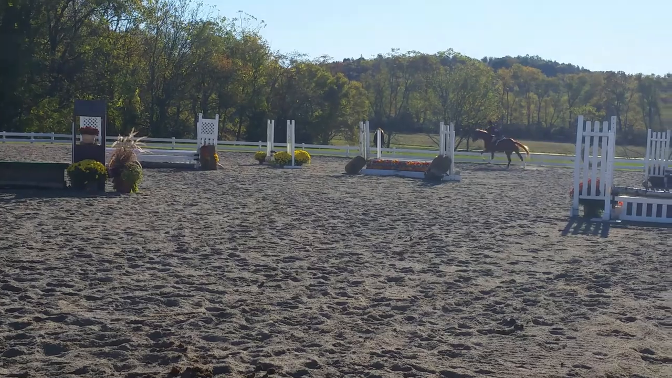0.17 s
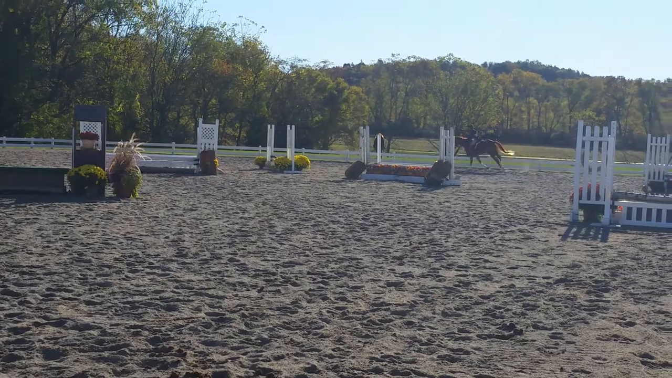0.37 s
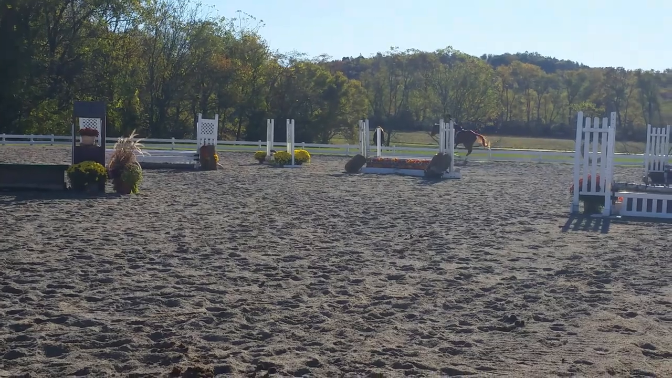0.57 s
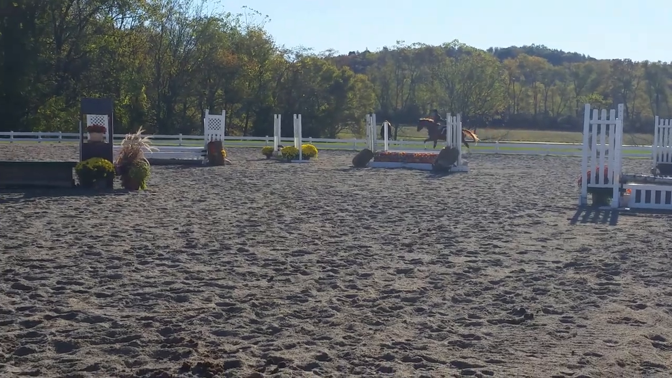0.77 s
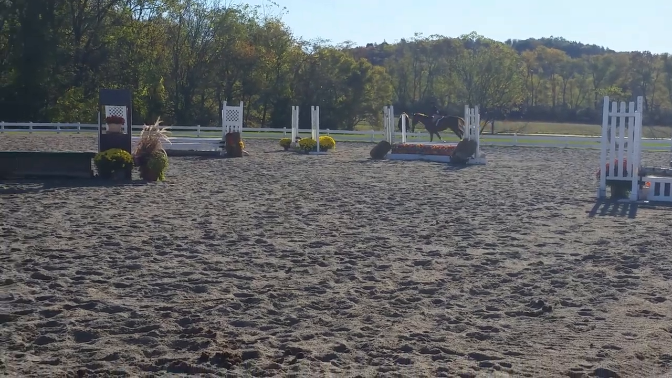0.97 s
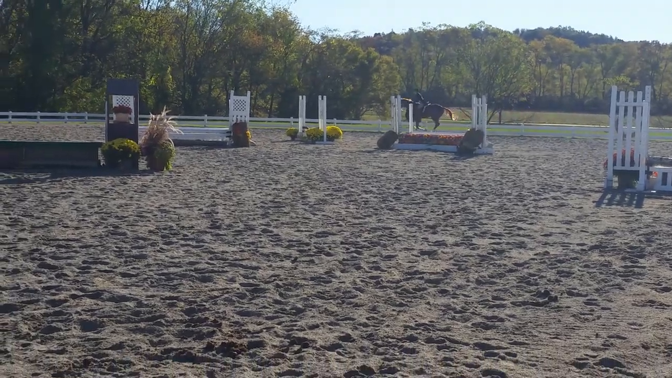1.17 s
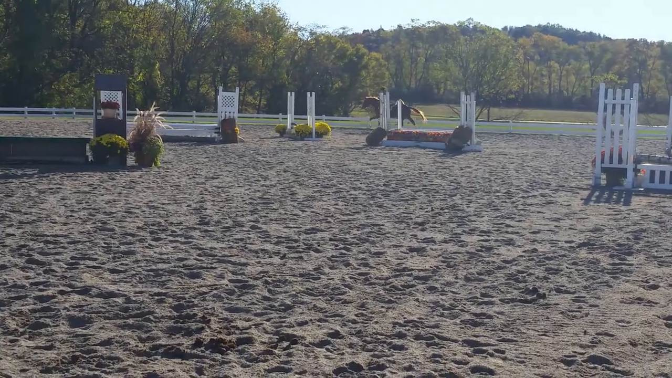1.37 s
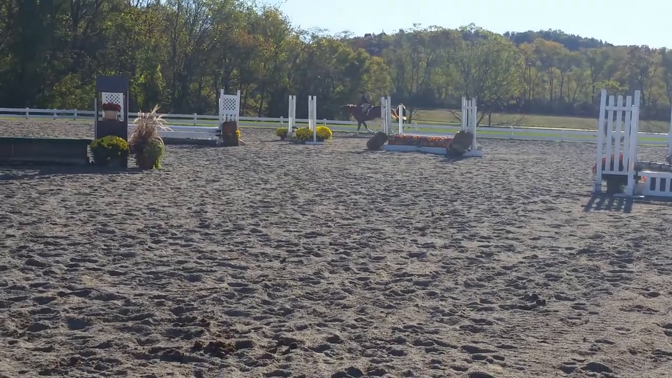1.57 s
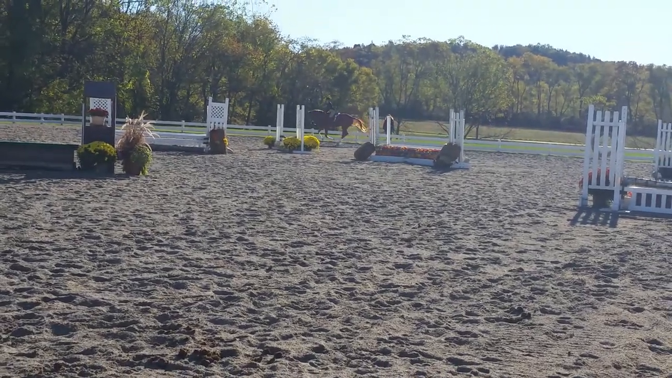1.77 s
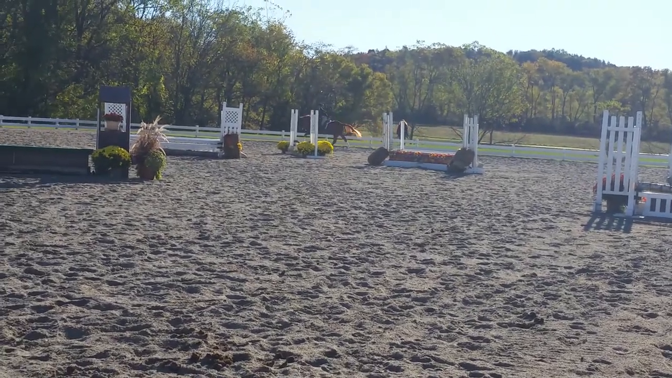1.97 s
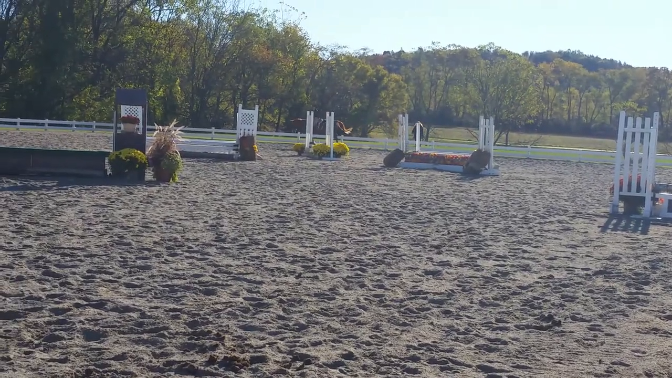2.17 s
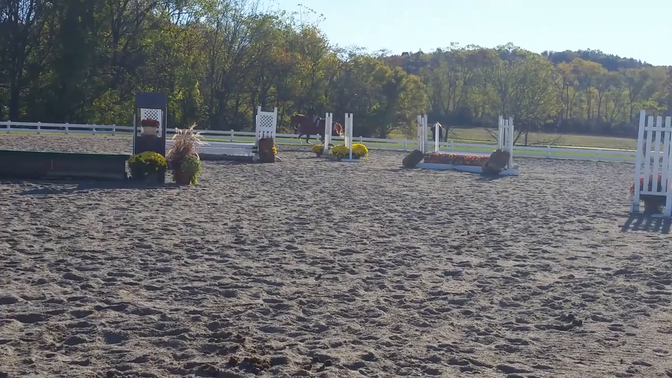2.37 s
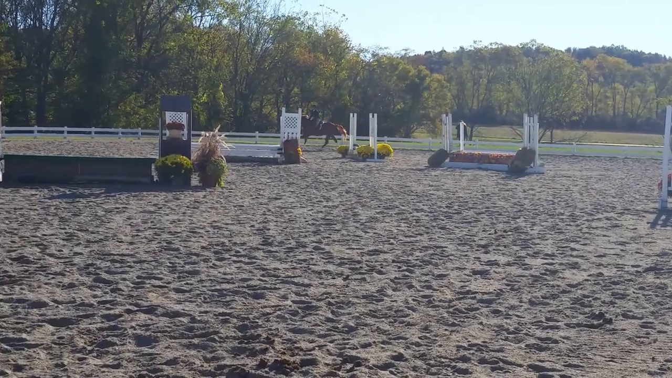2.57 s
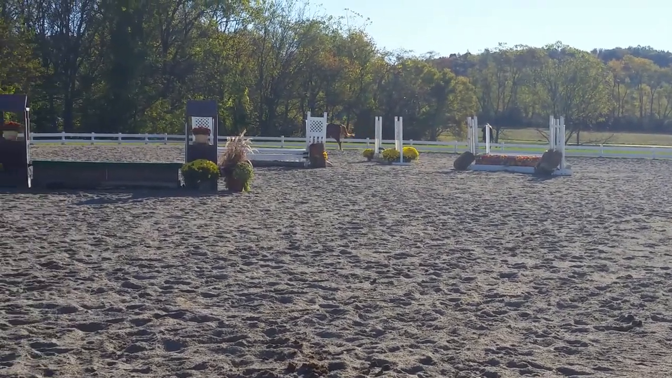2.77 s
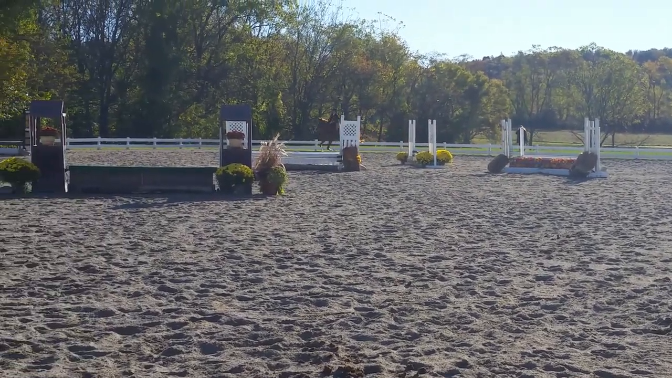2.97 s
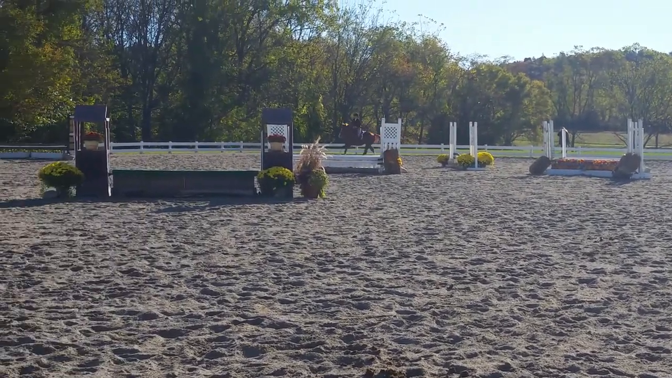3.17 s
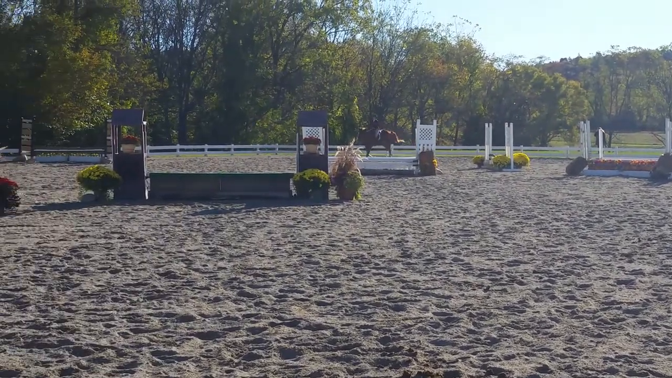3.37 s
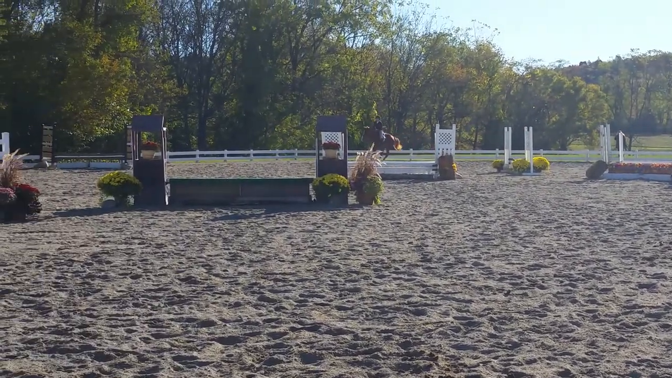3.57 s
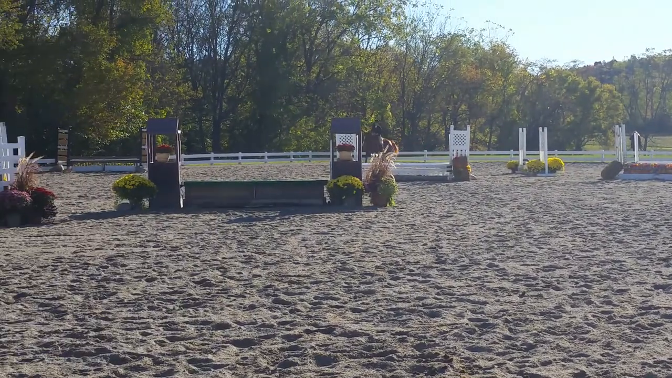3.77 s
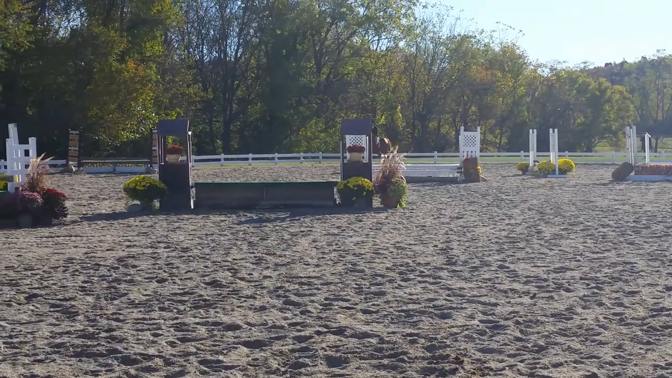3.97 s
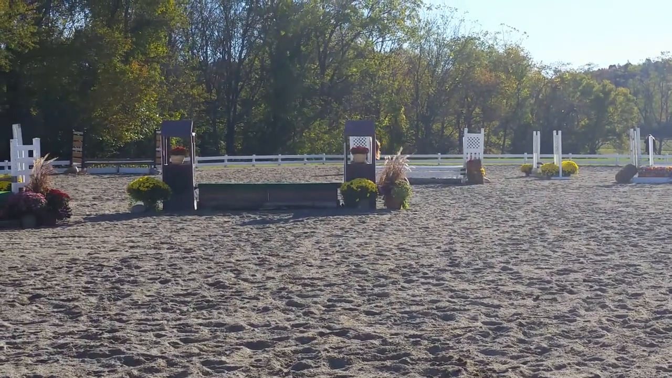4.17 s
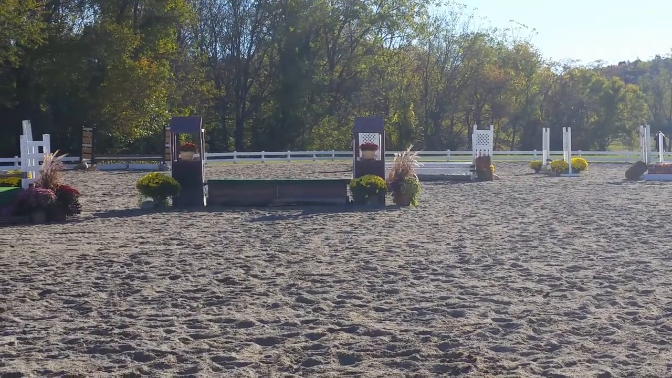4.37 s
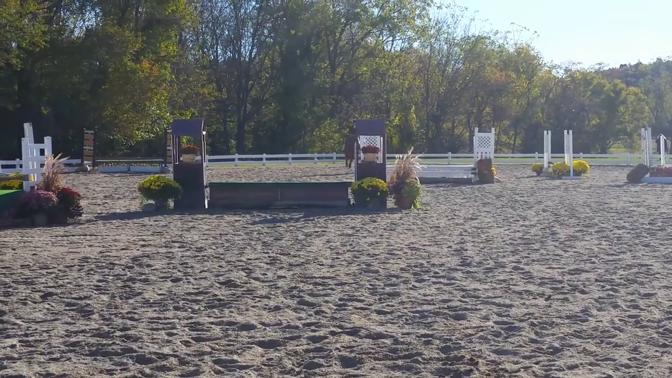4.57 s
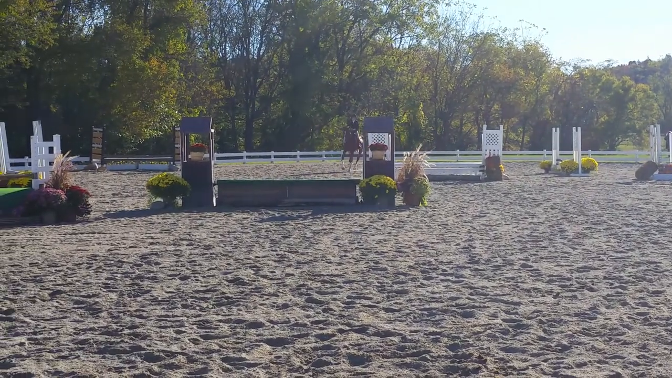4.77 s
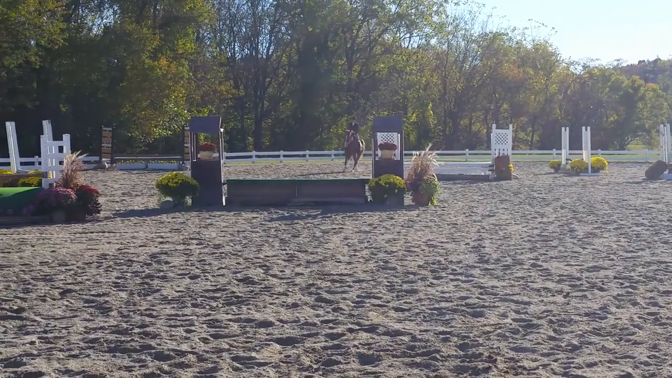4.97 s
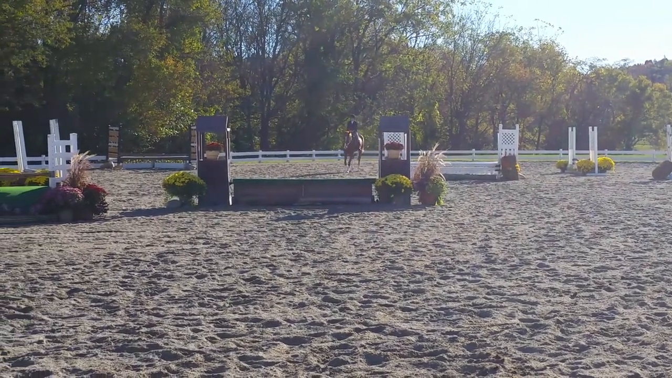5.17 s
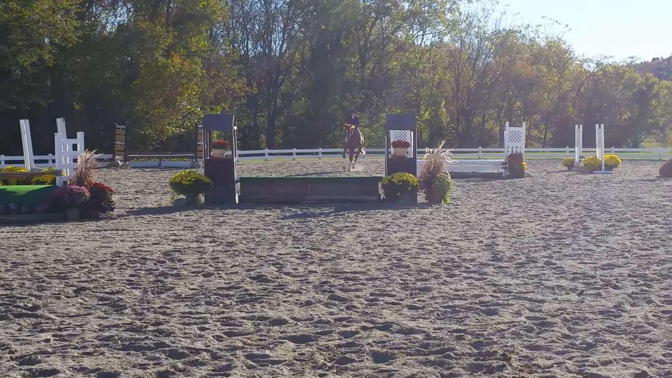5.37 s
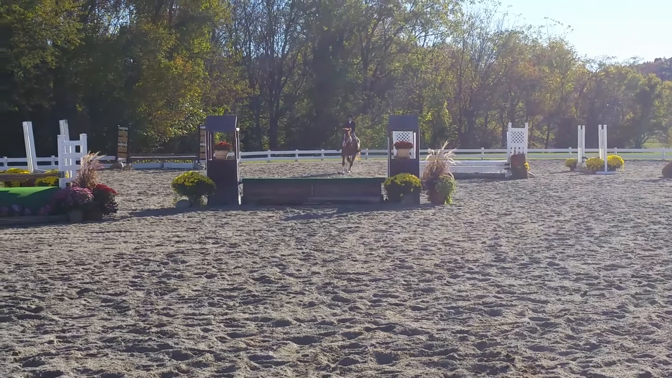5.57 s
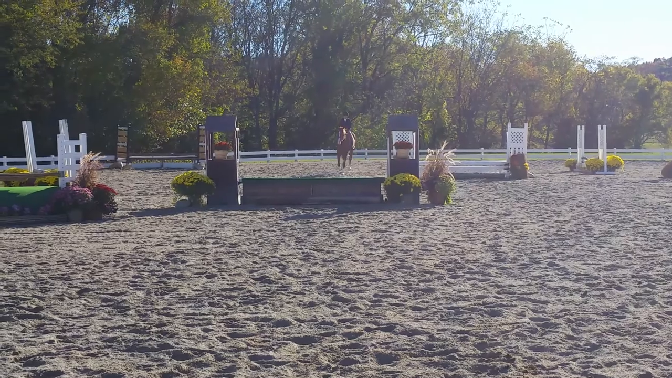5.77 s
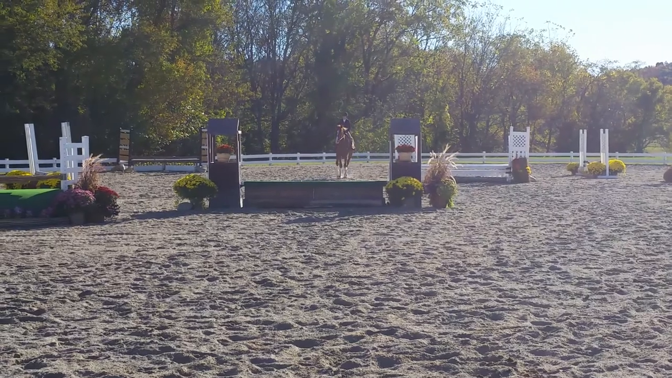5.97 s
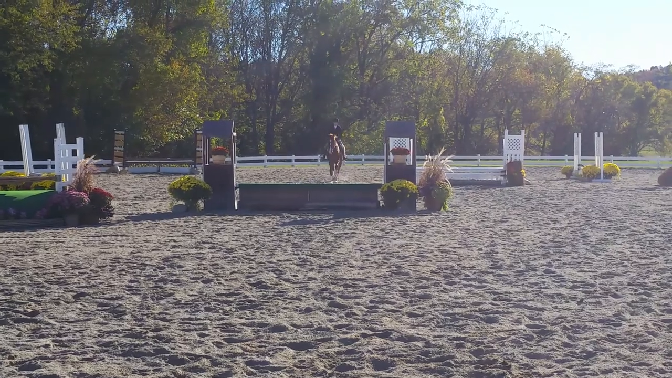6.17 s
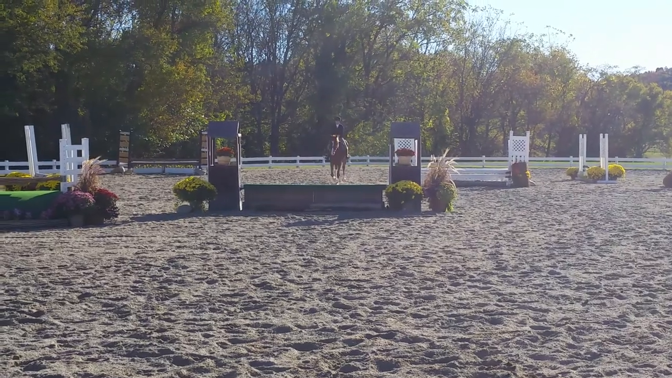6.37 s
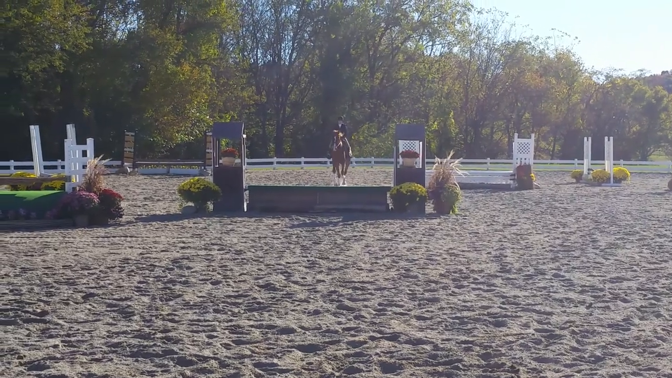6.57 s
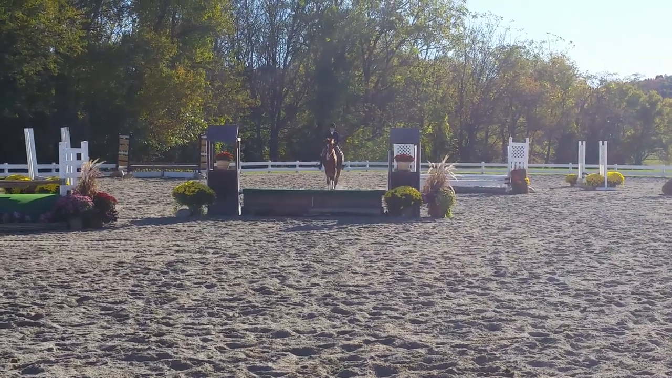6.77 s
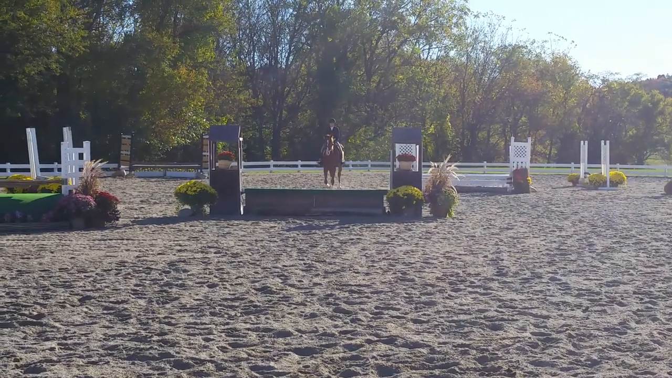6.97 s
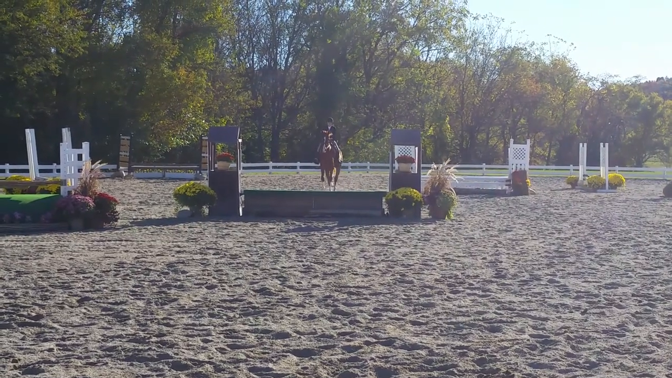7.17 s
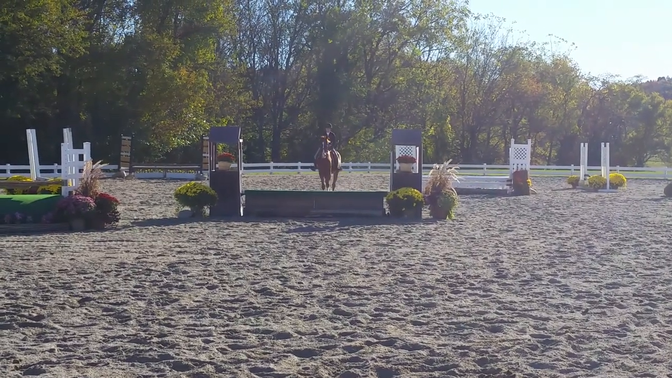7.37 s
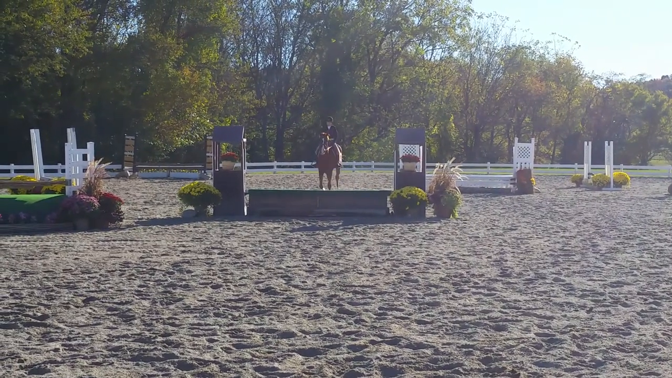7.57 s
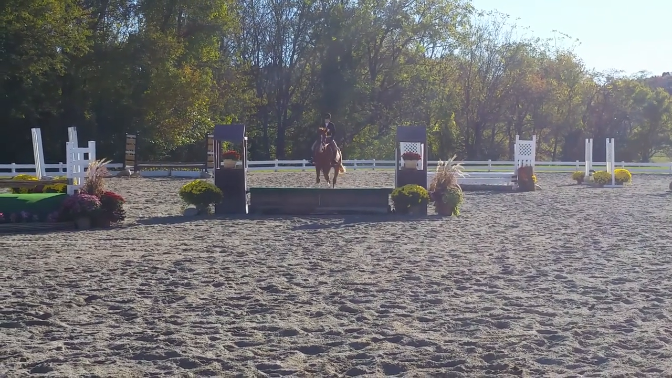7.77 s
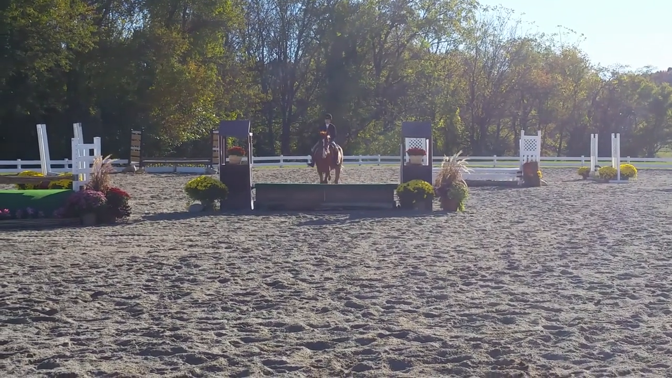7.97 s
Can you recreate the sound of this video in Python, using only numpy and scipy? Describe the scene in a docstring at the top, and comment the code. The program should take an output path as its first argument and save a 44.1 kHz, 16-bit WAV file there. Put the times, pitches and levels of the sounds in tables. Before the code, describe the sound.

A hand-held microphone in an open sand arena. A short wind bump opens, then a sleeve rustles brightly close by, peaking just before one second and again around two, with small grip ticks. A quieter airy stretch follows with low gusts and very faint, dull hoof scuffs far off. After five seconds wind buffets hard, first mostly on the left, then heavier and toward the right at the end.

```python
"""Wind on a hand-held camera in a sand arena

Gusty wind rumbles at two microphone ports: shaped noise, with bursts and sudden pressure flips on top.
A sleeve slides close by in two main passes: bright noise coloured by the ports, with one short low creak.
Hooves of a horse far off scuff the sand faintly: duller noise with short thuds. The grip ticks now and then.
Behind it lie the slowly swelling drone and hiss of the open field.
"""
import sys
import numpy as np
from scipy import signal
from scipy.fft import rfft, irfft
from scipy.io import wavfile
from scipy.ndimage import uniform_filter1d

SR = 44100
rng = np.random.default_rng(int(sys.argv[2]) if len(sys.argv) > 2 else 0)


def bounce(signal):
    """Save signal as a 16-bit WAV file at the path given by the first command-line argument."""
    frames = np.transpose(np.atleast_2d(signal))
    limited = np.clip(frames, -1, 1)
    pcm = np.round(limited * 32767).astype(np.int16)
    wavfile.write(sys.argv[1], SR, pcm)


N = 354034

# In all tables, a positive pan leans to the left port; levels are nominal, before random fluctuation.
# steady wind: (time [s], level [dB], pan [dB])
WIND_CURVE = [(0, -49, -6), (.7, -48, -9), (2.0, -50.5, -20), (3.5, -49.5, -2), (4.6, -51.5, 1.5),
              (5.3, -43, -9), (5.6, -29.5, 12), (6.35, -35.5, 4.5), (6.85, -28, -6), (7.12, -18.5, -0.5),
              (7.34, -30.5, -6), (7.52, -29.5, 5), (7.78, -19.5, -10), (8.03, -17, -2)]
# gusts: (peak time [s], peak level [dB], pan [dB], time to die by 10 dB [s], at least 0.005)
GUST_EVENTS = [(0.01, -24, -26, 0), (1.01, -40.5, -10.5, 0.3), (1.19, -34, -3, -0.04),
               (2.152, -23, 16, -0.14), (2.26, -29, -2, 0.04), (2.769, -31, -10, -0.1),
               (2.86, -26, -10, 0.0961), (2.94, -31, -1.5, 0.14), (3.28, -32, -2.5, 0.23),
               (4.739, -37.5, -16, 0.24), (5.392, -20.5, 25, 0.1947), (5.645, -19, 28, 0.09),
               (5.68, -22.5, 25, 0.115), (5.717, -25, 28, 0.02), (5.86, -28.5, 22, 0.3),
               (5.97, -24, 22, 0.17), (6.065, -14, 5, 0.0051), (6.208, -16.5, 7, -0.07),
               (6.69, -35.5, 13.5, 0.5), (6.97, -14, 3, 0.09), (7.25, -21.5, -11, 0.3),
               (7.425, -19.5, -6, 0.04), (7.55, -21, 4.5, 0.06), (7.63, -20, -8, 0.06),
               (7.712, -16.5, -3, 0.07), (7.89, -12, -15.5, -0.07), (8.01, -18.5, -1, 0.72)]
# wind pressure at reference air speed: (frequency [Hz], density [dB per Hz])
EDDY_SPECTRUM = [(15, -14), (40, -8.5), (80, 4.5), (130, -0.5), (200, -11), (300, -22.5), (500, -38.5),
                 (800, -55), (1400, -70), (3000, -110)]
# eddies bursting on a port: (start [s], peak above 300 Hz [dB], pan [dB], air speed factor [1])
BUFFET_EVENTS = [(2.128, -45.5, 19, 0.97), (5.7, -24.5, 29, 1.4), (7.036, -33, -21, 1.8),
                 (7.074, -33.5, -2, 1.8), (7.612, -25, -14, 1.2), (7.635, -26, -17.5, 1.34),
                 (7.674, -19.5, -17.5, 1.9), (7.688, -16, -23, 2.07), (7.893, -16.5, -25.5, 2.4),
                 (7.914, -15, -27, 2.74), (7.935, -22.5, -17, 2.1), (8.0, -22, -10.5, 1.56)]
# pressure of one burst at reference air speed: (frequency [Hz], density [dB per Hz])
BURST_SPECTRUM = [(20, -23), (60, -7), (100, 0.5), (160, -4), (240, -13.5), (350, -23), (480, -38.5),
                  (650, -57), (1000, -95.5)]
# pressure flips: (time [s], peak [dB], pan [dB], flip length, about trough to crest [s])
SLAP_EVENTS = [(0.0173, -23, -32, 0.0033), (1.188, -33, 3, 0.0033), (2.9061, -28.5, 12, 0.0032),
               (5.401, -14.5, 26, 0.0031), (5.6438, -9.5, 34, 0.0041), (5.712, -5, 38, .0013),
               (5.722, -3, 36, 0.0023), (5.8422, -13.5, 28, 0.003), (6.043, -20, 8, 0.0024),
               (6.063, -16.5, 8, 0.0056), (7.039, -21, -16, 0.0026), (7.0484, -14.5, -15, 0.0022),
               (7.1893, -20, -16, 0.0017), (7.219, -21.5, -11, 0.0022), (7.2328, -16, -22.5, .0017),
               (7.42, -16.5, -15, 0.0028), (7.6814, -13, -12, 0.002), (7.629, -13.5, -15, 0.0019),
               (7.7104, -10, -14.5, 0.0019), (7.741, -13, -11, 0.0032), (7.869, -11, -15.5, 0.0049),
               (7.898, -10.5, -19.5, 0.002), (8.0076, -5.5, -3, 0.0029)]
# sleeve strokes: (peak time [s], relative level [dB], rise by 20 dB [s], fall by 20 dB [s],
#                  brightness [dB per octave], catching [dB rms])
SLEEVE_STROKES = [(.05, -54.5, 0.48, 0.14, -2.2, 1.1), (0.361, -47.5, 0.24, 0.18, -1.2, 0.94),
                  (0.742, -31, 0.24, 0.16, 0.6, 1.6), (0.869, -31, 0.17, 0.23, 1.34, 0.89),
                  (1.22, -43.5, 0.85, 0.24, -1.04, 1.5), (1.38, -51.5, 0.11, 0.23, -1.2, 1.8),
                  (1.55, -50, 0.035, 0.091, -0.5, 1.5), (1.93, -40.5, 0.27, 0.25, 0, 0.52),
                  (2.182, -37.5, 0.41, 0.41, 0.26, 0.28), (2.97, -56.5, 0.71, 0.27, -2.5, 1.5)]
# churned sand: (time [s], level [dB])
SWISH_CURVE = [(3.0, -68), (3.95, -65), (4.02, -74), (4.25, -79), (4.5, -83), (4.85, -59.5), (5.11, -82),
               (5.24, -64.5), (5.45, -62), (5.56, -82), (5.66, -64), (5.8, -73), (6.0, -66), (6.4, -63),
               (6.81, -93.5), (6.91, -65), (7.87, -74), (8.03, -62.5)]
# hoof scuffs: (time [s], level [dB], decay time constant [s], dullness [0-1], thud over spray [dB])
HOOF_SCUFFS = [(3.244, -56.5, 0.1, 0.33, -3), (3.315, -49, 0.04, 0.45, 2), (3.57, -55, 0.014, 0.24, -14),
               (3.838, -50.5, 0.015, 0.07, 4), (3.88, -59, 0.024, .25, -10),
               (3.903, -57, 0.052, 0.2, -14.5), (3.954, -53.5, .015, 0.22, -9), (4.844, -61, .02, 0.9, -5),
               (5.4, -65, 0.036, 0.9, -2), (5.603, -61.5, 0.039, 0.4, -6), (5.952, -59.5, 0.02, 1, 6),
               (6.029, -56, 0.015, 1, 10.5), (6.048, -51.5, 0.034, 1, 9)]
# port colour: (frequency [Hz], left density [dB per Hz], right density [dB per Hz])
PORT_COLOUR = [(430, -3, -2.5), (1070, -8.5, -8.5), (1780, -4.5, -12), (2820, -19.5, -20), (3730, -18, -17),
               (4320, -5.5, -18.5), (5300, -11, -22), (6700, 1, -17.5), (7440, -3.5, -13.5),
               (8000, -14, -13), (8340, -9.5, -8.5), (9100, -10.5, -2.5), (10000, -11.5, -7),
               (11500, -13.5, -7.5), (13100, -18, -10), (15700, -8.5, -14)]
# port delay: (frequency [Hz], left lead [rad])
PORT_LEAD = [(0, 2.5), (2410, -1.5), (4130, -3), (6890, -8.5), (8270, -14), (9910, -17), (12700, -25.5),
             (15600, -28.5)]
# port coherence: (frequency [Hz], left-right likeness [0-1])
PORT_LIKENESS = [(300, 0.99), (1800, 0.8), (3000, 0.51), (15000, 0.29)]
# grip ticks: (time [s], peak [dB], centre [Hz], offset where 6 dB down [octaves], pan [dB])
GRIP_TICKS = [(0.751, -29, 3000, 1.7, 2), (0.867, -29, 1200, 1.1, 3.5), (1.5459, -49.5, 8000, 1.3, 0.5),
              (2.825, -51, 8000, 0.89, 6), (3.8416, -44, 9000, 0.77, -6), (4.107, -52, 11000, 1.9, 19),
              (4.417, -56, 2000, 0.25, 7), (5.387, -47, 12000, 1.7, 15), (6.3799, -40, 1300, 1.6, 9),
              (6.662, -49, 11000, 1.1, 19), (7.947, -46, 9000, 1.6, 6.5), (7.9667, -38, 900, 2.1, -18),
              (7.974, -38.5, 11000, 0.54, -22), (8.017, -44, 10000, .8, -18)]
# creak of the catching sleeve: (start [s], length [s], start pitch [Hz], end pitch [Hz], level [dB])
SLEEVE_CREAK = (.665, .09, 295, 355, -45)
# open air: (frequency [Hz], left density [dB per Hz], right density [dB per Hz])
AIR_SPECTRUM = [(28, -13.5, -19), (62.6, -1.5, -2.5), (108, -5.5, -4.5), (199, -13.5, -13.5),
                (408, -21, -21), (840, -32, -32), (1330, -39, -38.5), (2680, -46, -47),
                (3320, -43.5, -49.5), (3580, -50.5, -55.5), (4580, -37, -52), (5370, -51.5, -58),
                (7000, -50, -63), (9100, -63.5, -59), (15500, -51.5, -50.5)]
# open-air coherence: (frequency [Hz], left-right likeness [-1 to 1])
AIR_LIKENESS = [(60, 0.85), (150, 0.97), (380, 0.91), (950, -0.33), (2380, -0.02), (5980, 0.032),
                (15000, -0.12)]
# field swells: (time [s], drone gain [dB], middle hiss gain [dB], top hiss gain [dB])
FIELD_SWELLS = [(0, 7, 3.5, 9), (1, -4, 3, -10), (2, 1, -3, -8), (3, 3.5, 0, 11), (3.7, 3, 3.5, 5.5),
                (4.3, -4.5, -4, -5.5), (5.1, -0.5, 0, 0.5), (5.5, 8, 1.5, 4.5), (6.3, 0.5, 3.5, 7),
                (7, 2, 0.2, 9), (8.03, 10.5, 1.5, 10.5)]
# bands where the drone stands out: (centre [Hz], width [Hz], gain [dB])
DRONE_PEAKS = [(109, 22, 4.5), (225.6, 39.8, 10.5), (475, 19, 5)]

GUST_RISE_SHARE = 0.29  # of the time to die
BURST_S, SPLIT_HZ, TREBLE_SHARE = 0.045, 380, 0.66  # above the split a burst lasts only this share
SLAP_BEFORE, SLAP_AFTER = 0.74, 2.23  # reach in flip lengths
SLAP_SLOWS = 0.41  # slows the swings around the flip
SLAP_EDGE, EDGE_REACH = 0.21, 0.4  # steeper mid-flip step: share, reach in flip lengths
SAND_HZ, SAND_WIDTH_HZ, SAND_DB = 1900, 330, 4.5  # band where sand stands out
THUD_HZ, SCUFF_RISE_SHARE = 950, 0.46  # thud's upper limit; rise as a share of the decay
AIR_DB, EDGE_HZ = -49, 15800


def gain_of(db):
    """Decibels to amplitude gain."""
    return 10 ** (np.asarray(db) / 20)


def power_of(db):
    """Decibels to power."""
    return gain_of(2 * db)


def evened(x):
    """Scales to rms 1."""
    return x / np.sqrt(np.mean(x ** 2) + 1e-20)


def read(table, hz):
    """Spectrum columns at hz, interpolated over log frequency."""
    f, *columns = np.transpose(table)
    return np.array([np.interp(np.log(hz + 1), np.log(f + 1), c) for c in columns])


def follow(table, t):
    """Curve columns at times t."""
    s, *columns = np.transpose(table)
    return [np.interp(t, s, c) for c in columns]


def grid(size):
    """Frequencies (column) and times (row) of short-time spectra overlapping by three quarters."""
    hop = size // 4
    return np.fft.rfftfreq(size, 1 / SR)[:, None], np.arange(N // hop + 2) * hop / SR


def noise(db, same):
    """Two-channel noise from a dB field (2, bins, frames) and a complex left-right likeness."""
    bins, frames = db.shape[1:]
    shape = (2, frames, bins)
    draws = rng.standard_normal(shape) + 1j * rng.standard_normal(shape)
    left, other = draws.swapaxes(1, 2)
    right = same * left + np.sqrt(1 - abs(same) ** 2) * other
    size = 2 * (bins - 1)
    spectra = np.array([left, right]) * gain_of(db)
    _, sound = signal.istft(spectra, nperseg=size, noverlap=size - size // 4)
    return sound[:, :N]


def wander(shape, size):
    """Slow random numbers of rms 1 along the last axis."""
    smooth = uniform_filter1d(rng.standard_normal(shape), size)
    return evened(uniform_filter1d(smooth, size))


def sides(pan_db):
    """Left and right offsets [dB] for a pan; both lie below 0 dB."""
    return -10 * np.log10(1.5 + 10 ** (np.array([-pan_db, pan_db]) / 10))


def power_db(db):
    """Summed power [dB] over the bins of a dB field."""
    return 10 * np.log10((10 ** (db / 10)).sum(-2, keepdims=True))


def apart(t, s, rise, fall):
    """Distance from the peak at s, in units of the rise before it and the fall after it."""
    return np.where(t < s, (s - t) / max(rise, .005), (t - s) / max(fall, .005))


def add_at(out, start, sound):
    """Adds a two-channel sound at a sample index, cut at the end of out."""
    part = out[:, start:][:, :sound.shape[1]]
    part += sound[:, :part.shape[1]]


def wind():
    """Unrelated lumpy rumble at each port; faster air is louder and carries eddies to higher pitch."""
    hz, t = grid(size=1024)
    level_db, pan_db = follow(WIND_CURVE, t)
    power = power_of(level_db + sides(pan_db))
    for s, db, pan_db, fall_s in GUST_EVENTS:
        decay_db = 10 * apart(t, s, GUST_RISE_SHARE * fall_s, fall_s)
        power = power + power_of(db + sides(pan_db)[:, None] - decay_db)
    port_db = 10 * np.log10(power) + 2.28 * wander((2, len(t)), size=3)
    speed = np.maximum(gain_of(0.18 * (port_db + 23.0)), .8)
    shape_db = np.array([read(EDDY_SPECTRUM, hz / v)[0] for v in speed])
    lumps = gain_of(3.23 * wander((2, N), size=400))
    return lumps * noise(shape_db - power_db(shape_db) + port_db[:, None], 0)


def buffets():
    """Quick swells of turbulence, unrelated at the ports; a faster eddy reaches higher pitch."""
    t = np.arange(8192) / SR
    hz = np.fft.rfftfreq(len(t), 1 / SR)
    out, lead_s = np.zeros((2, N)), .05
    low_share = 1 / (1 + (hz / SPLIT_HZ) ** 4)
    for s, db, pan_db, speed in BUFFET_EVENTS:
        draw = rng.standard_normal((2, len(t)))
        low, high = (rfft(draw * np.sin(np.pi * np.clip((t - lead_s) / length_s, 0, 1) ** 0.49))
                     for length_s in (BURST_S, TREBLE_SHARE * BURST_S))
        spectrum = low_share * low + (1 - low_share) * high
        spectrum = spectrum * gain_of(read(BURST_SPECTRUM, hz / max(speed, .5))[0])
        peak = abs(irfft(spectrum * (hz > 300))).max(1, keepdims=True)
        burst = gain_of(db + sides(pan_db))[:, None] * irfft(spectrum) / peak
        add_at(out, max(round((s - lead_s) * SR), 0), burst)
    return out


def slaps():
    """One quick flip of pressure each, of random sign, between a short swing and a longer one."""
    out, signs = np.zeros((2, N)), rng.choice([-1., 1.], len(SLAP_EVENTS))
    t = np.arange(-700, 1400) / SR
    for (s, db, pan_db, flip_s), sign in zip(SLAP_EVENTS, signs):
        u = t / flip_s
        reach = SLAP_BEFORE + (SLAP_AFTER - SLAP_BEFORE) * (1 + np.tanh(u)) / 2
        swing = np.sin(np.pi * u / np.sqrt(1 + SLAP_SLOWS * u ** 2)) * np.exp(-(u / reach) ** 2)
        swing = swing + SLAP_EDGE * u / EDGE_REACH * np.exp(-(u / EDGE_REACH) ** 2)
        slap = sign * gain_of(db + sides(pan_db))[:, None] * swing / abs(swing).max()
        add_at(out, max(round((s + t[0]) * SR), 0), slap)
    return out


def sleeve_power(hz, t, octaves):
    """Power of sliding cloth: strokes swell and fade while the weave catches and slips."""
    slips = wander(len(t), size=8)
    power = 0
    for s, db, rise_s, fall_s, tilt, catch_db in SLEEVE_STROKES:
        fade_db = 20 * apart(t, s, rise_s, fall_s) ** 1.93
        power = power + power_of(db - fade_db + tilt * octaves + catch_db * slips)
    # the rustle drifts in colour, mostly in the treble
    bands = evened(uniform_filter1d(wander((len(hz), len(t)), size=40), size=14, axis=0))
    return 0.4 * power * power_of(2.4 * bands / (1 + (2500 / (hz + 1)) ** 2))


def far_colour_db(hz, octaves, ports_db):
    """Colour of distant sand: distance takes the treble and weakens the colour of the ports."""
    dull_db = -14.0 * np.maximum(np.log2((hz + 1) / 7500), 0) ** .5 - 1.5 * octaves
    dull_db = dull_db + SAND_DB * np.exp(-((hz - SAND_HZ) / SAND_WIDTH_HZ) ** 2)
    return dull_db - 0.34 * (ports_db - ports_db.mean())


def swish_power(t, dull_db):
    """Power of churned sand: a dull wash of grains that follows the swish curve."""
    level_db = np.where(t > SWISH_CURVE[0][0], follow(SWISH_CURVE, t)[0], -150)
    return power_of(level_db + 1.6 * wander(len(t), size=4) + dull_db)


def hoof_power(hz, t, octaves, dull_db):
    """Power of hoof scuffs: a spray of sand and a low thud share one quick rise and decay."""
    power = 0
    for s, db, decay_s, dullness, thud_db in HOOF_SCUFFS:
        rise_s = SCUFF_RISE_SHARE * decay_s
        envelope = np.exp(-np.maximum(t - s, 0) / decay_s - np.maximum(s - t, 0) / rise_s)
        spray = power_of(2.0 * dullness * dull_db)
        thud = power_of(thud_db - 2.0 * octaves) / (1 + (hz / THUD_HZ) ** 6)
        power = power + (gain_of(db) * envelope) ** 2 * (spray + thud)
    return power


def friction():
    """Cloth and sand as grainy noise reaching both ports through their own colour and delay."""
    hz, t = grid(size=512)
    octaves = np.log2((hz + 200) / 6000)
    ports_db = read(PORT_COLOUR, hz)
    ports_db = ports_db - power_db(ports_db).max()
    dull_db = far_colour_db(hz, octaves, ports_db)
    power = 1e-15 + sleeve_power(hz, t, octaves)
    power = power + swish_power(t, dull_db) + hoof_power(hz, t, octaves, dull_db)
    same = np.clip(read(PORT_LIKENESS, hz)[0], 0, 1) * np.exp(-1j * read(PORT_LEAD, hz)[0])
    grain = gain_of(1.3 * wander(N, size=20))
    return grain * noise(ports_db + 10 * np.log10(power), same)


def ticks():
    """Ticks of the grip: about a millisecond of band-shaped noise, lightly coloured by the ports."""
    out, t = np.zeros((2, N)), np.arange(-64, 448) / SR
    hz = np.fft.rfftfreq(len(t), 1 / SR)
    for s, db, centre_hz, spread_octaves, pan_db in GRIP_TICKS:
        envelope = np.exp(-np.maximum(t, 0) / 0.00065 - np.maximum(-t, 0) / 0.00081)
        snap = rng.standard_normal(len(t)) * envelope
        band_db = -6.0 * (np.log2((hz + 100) / centre_hz) / max(spread_octaves, .2)) ** 2
        snap = irfft(rfft(snap) * gain_of(0.08 * read(PORT_COLOUR, hz) + band_db))
        tick = gain_of(db + sides(pan_db))[:, None] * snap / abs(snap).max(1)[:, None]
        add_at(out, round((s + t[0]) * SR), tick)
    return out


def creak():
    """The sleeve catches: a wavering low tone, alike at both ports, rises in pitch while it fades."""
    s, length_s, start_hz, end_hz, db = SLEEVE_CREAK
    u = np.clip((np.arange(N) / SR - s) / length_s, 0, 1)
    hz = (start_hz + (end_hz - start_hz) * u) * (1 + 0.038 * wander(N, size=200))
    level = gain_of(db + 7.2 * wander(N, size=300)) * np.sin(np.pi * u ** .5)
    return level * np.sin(2 * np.pi * np.cumsum(hz) / SR)


def air():
    """Far drone and hiss of the open field: noise whose low, middle and top ranges swell apart."""
    hz, t = grid(size=2048)
    base_db = read(AIR_SPECTRUM, hz)
    field_db = base_db - power_db(base_db).max() + 2.0 * wander((len(hz), len(t)), size=4)
    drone_db, middle_db, top_db = follow(FIELD_SWELLS, t)
    field_db = field_db + drone_db / (1 + (hz / 2500) ** 2)
    field_db = field_db + middle_db * np.exp(-np.log2((hz + 1) / 3000) ** 2)
    field_db = field_db + top_db / (1 + (9000 / (hz + 1)) ** 4)
    for centre_hz, width_hz, db in DRONE_PEAKS:
        field_db = field_db + db * np.exp(-(2 * (hz - centre_hz) / width_hz) ** 2)
    return gain_of(AIR_DB) * noise(field_db, np.clip(read(AIR_LIKENESS, hz)[0], -1, 1))


def scene():
    """All sources summed at the two ports."""
    return wind() + buffets() + slaps() + friction() + ticks() + creak() + air()


def record(dry):
    """Eases both ends over 6 ms and limits the band by a linear-phase low-pass."""
    taps = signal.firwin(1023, EDGE_HZ, window=("kaiser", 9), fs=SR)
    eased = dry * signal.windows.tukey(N, .012 * SR / N)
    return signal.oaconvolve(eased, taps[None], "same")


dry = scene()
out = record(dry)
bounce(out)
```